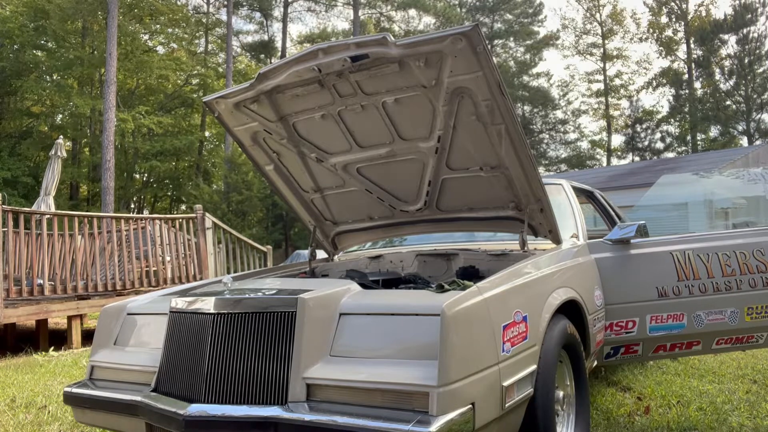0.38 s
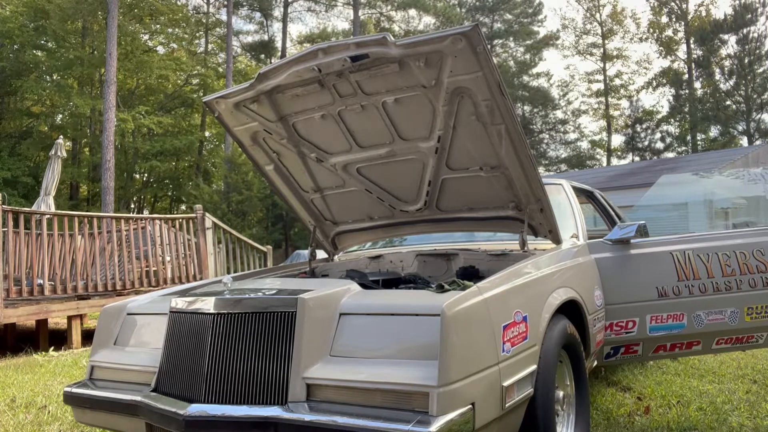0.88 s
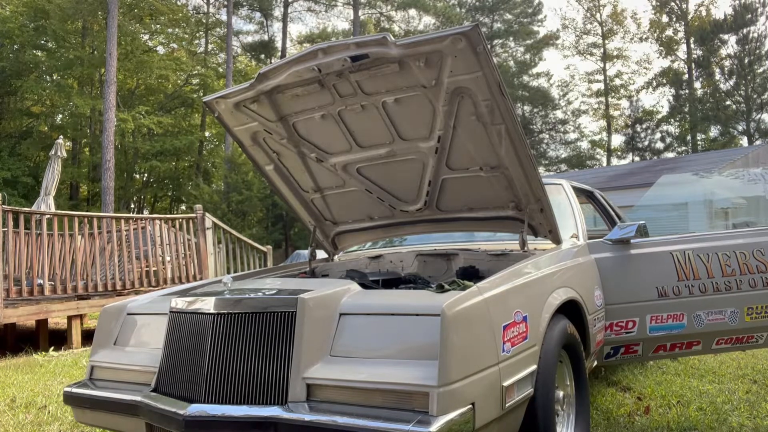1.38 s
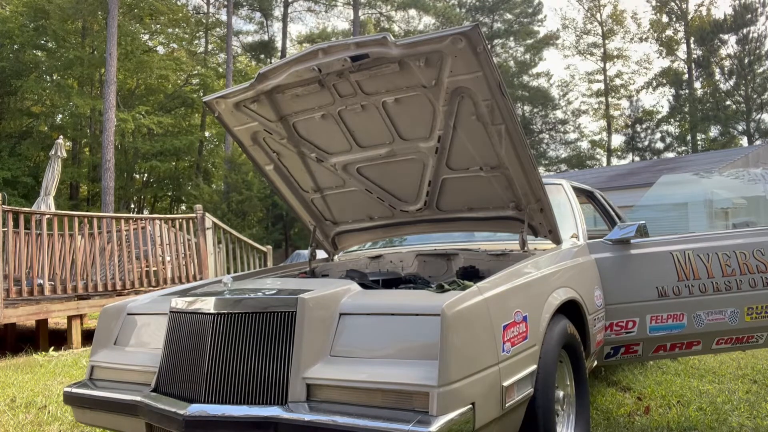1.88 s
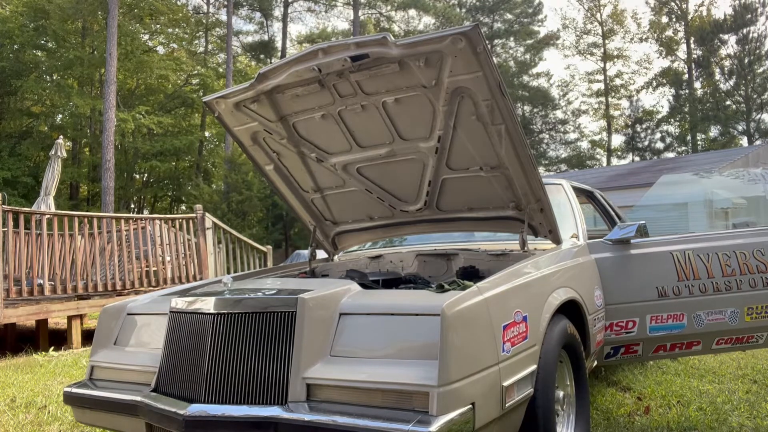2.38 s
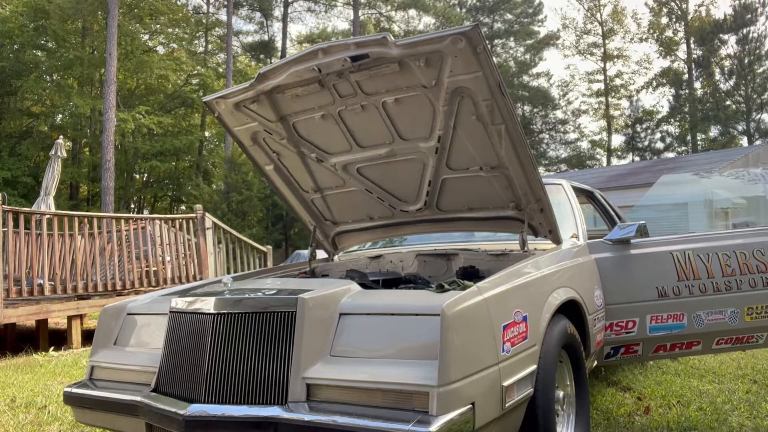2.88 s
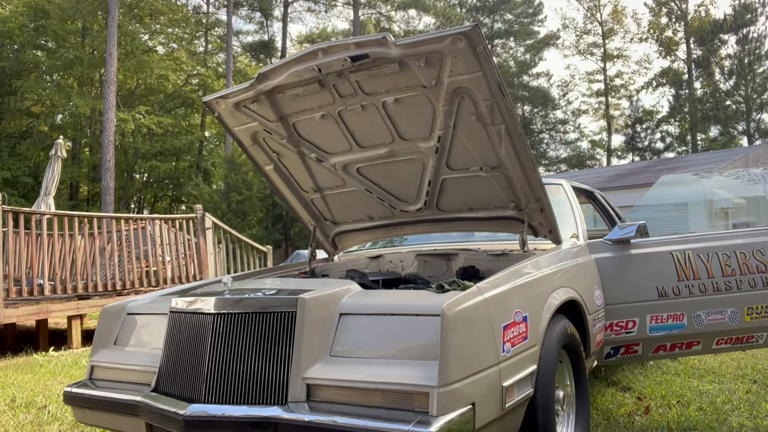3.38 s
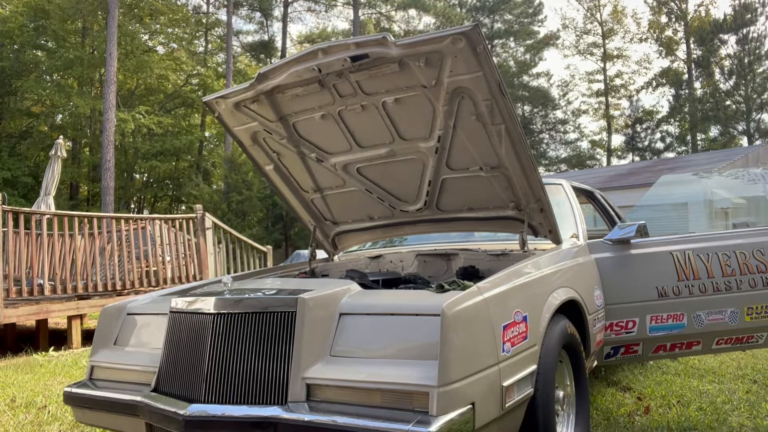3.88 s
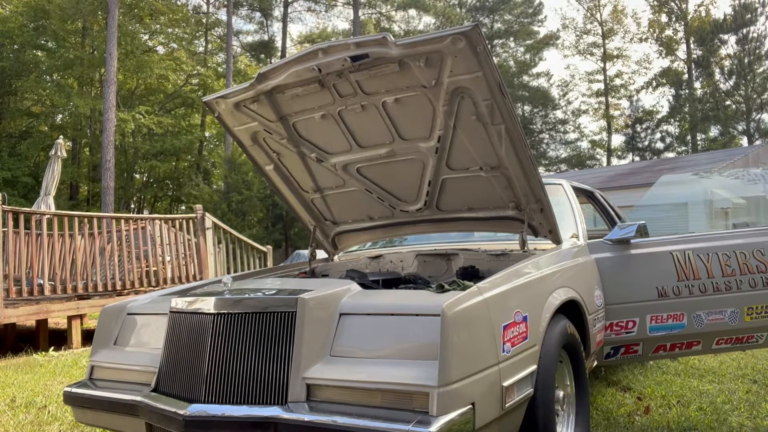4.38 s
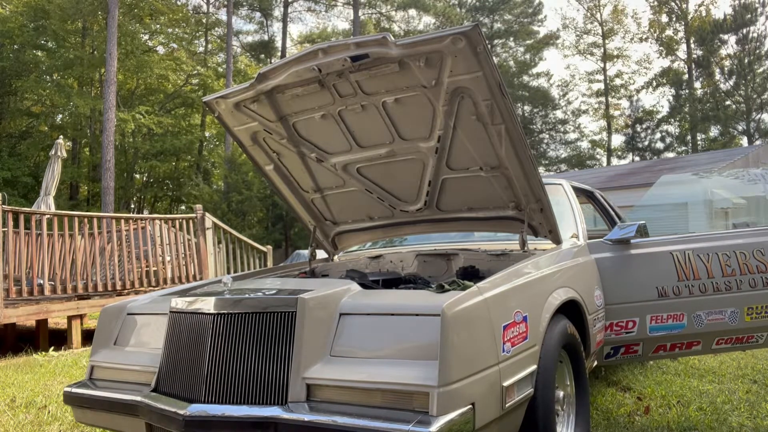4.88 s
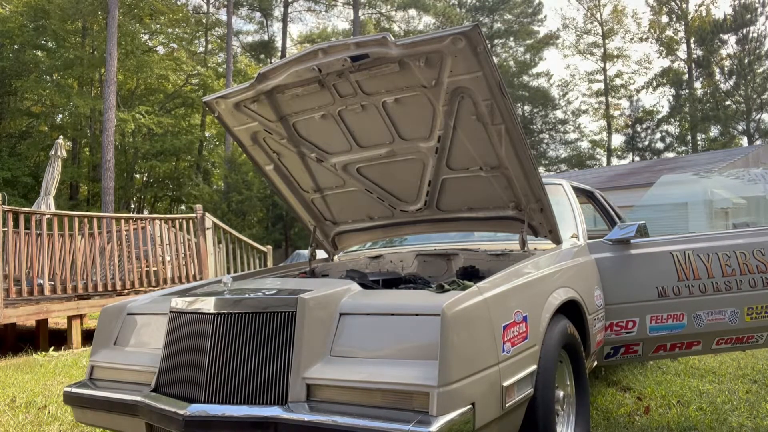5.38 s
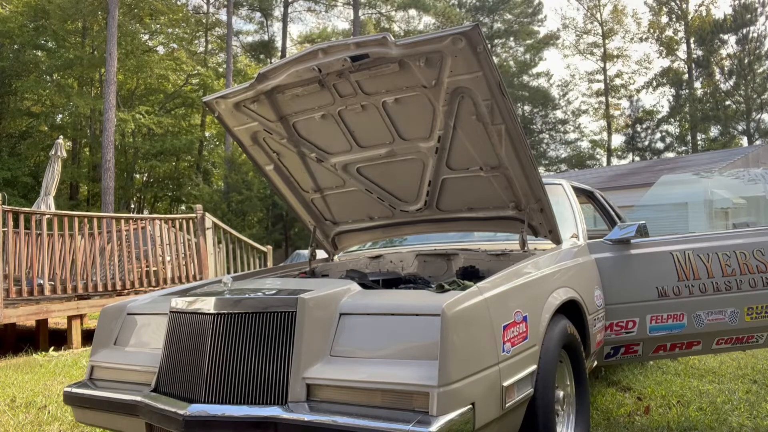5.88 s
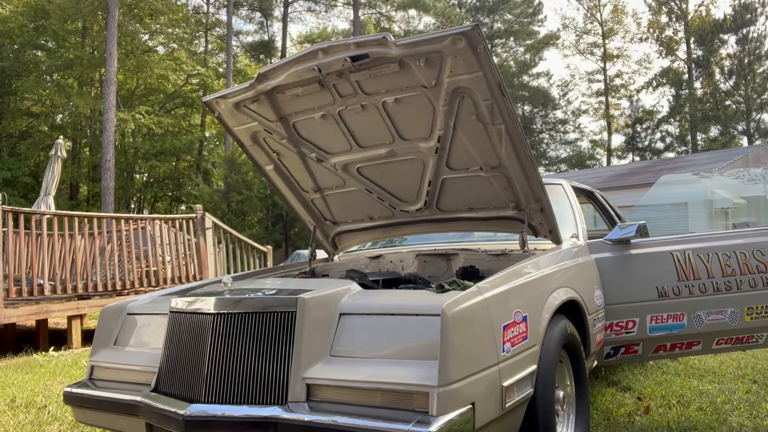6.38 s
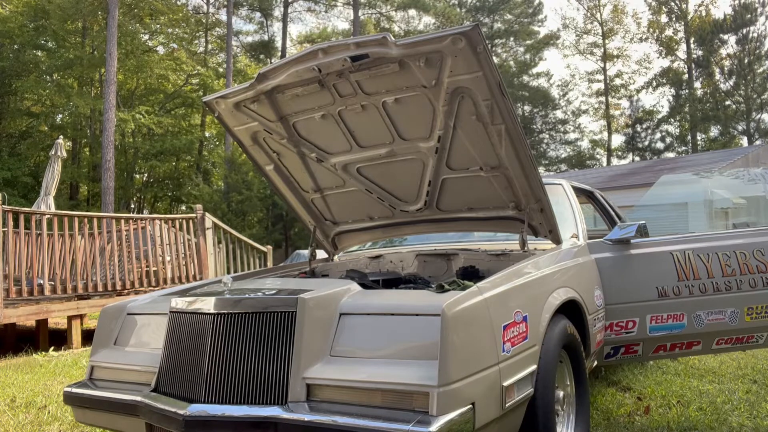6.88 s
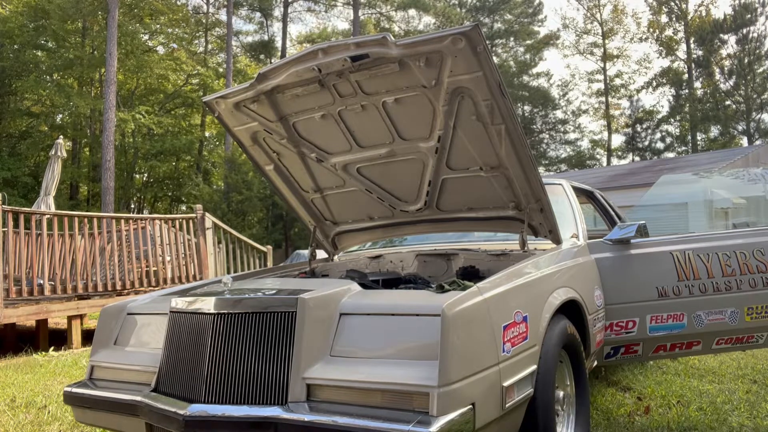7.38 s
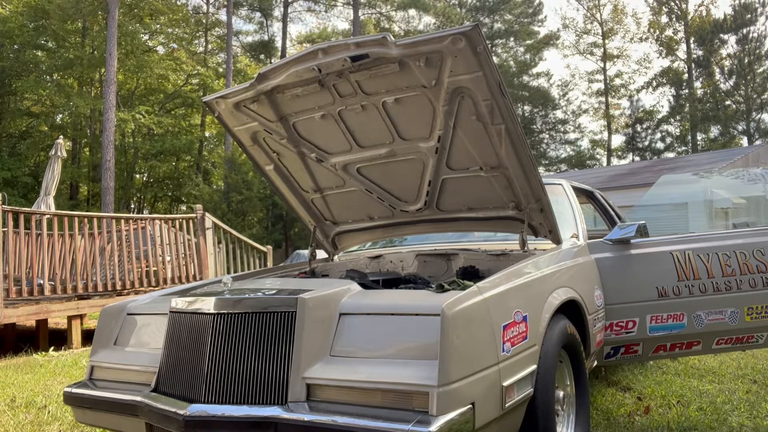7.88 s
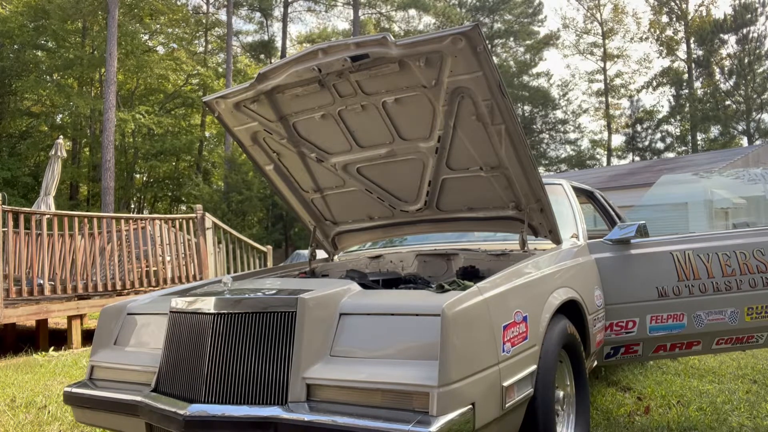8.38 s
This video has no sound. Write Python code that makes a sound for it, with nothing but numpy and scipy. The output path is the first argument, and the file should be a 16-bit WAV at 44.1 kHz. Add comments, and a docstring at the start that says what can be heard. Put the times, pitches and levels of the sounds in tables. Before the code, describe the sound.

Close by, a hot-cammed V8 chugs and spits through two exhausts, with six quick throttle blips before settling into a lumpy, ticking idle.

```python
"""A large V8 with a racing camshaft lopes on a lawn, bonnet open, taken by a small microphone pair at the front corner.
From the start, uneven firings thump down two pipes, strong ones spit rasping gas and ring the tailpipe tips;
low crank orders drone, valve gear ticks, intake and fan hiss, and trees and a house send back dull echoes.
Four throttle blips crest in the first two seconds and two more between 3.2 and 3.8 s.
After them the engine idles unevenly to the end, stumbling about four times a second."""
import sys
import numpy as np
from scipy import signal
from scipy.fft import rfft, irfft
from scipy.io import wavfile
from scipy.ndimage import uniform_filter1d

SR = 44100
rng = np.random.default_rng(int(sys.argv[2]) if len(sys.argv) > 2 else 0)


def rack_gain(trim_db):
    """Turn a fader trim in dB into the linear factor to multiply a signal by."""
    fader = np.asarray(trim_db, float)
    return 10 ** (fader / 20)


def inscribe(sig):
    """Save sig as 16-bit PCM at rate SR to the path in sys.argv[1].

    A 1-D sig is mono; a 2-D sig holds one channel per row.
    Samples are clipped to [-1, 1] before scaling.
    """
    pcm = np.round(np.clip(np.atleast_2d(sig).T, -1, 1) * 32767)
    wavfile.write(sys.argv[1], SR, pcm.astype(np.int16))


N = 375291

# Engine speed before the stumbles sag it: [t/s, half the firing rate f/Hz]
SPEED = [(0.0, 32.6), (0.3, 32.06), (0.57, 27.42), (0.85, 32.26), (1.12, 28.24), (1.45, 34.41),
         (1.72, 31.54), (2.0, 36.15), (2.35, 28.36), (3.05, 29.23), (3.3, 32), (3.6, 31.6), (3.86, 33.3),
         (4.2, 28.89), (5.2, 28.42), (6.2, 28.9), (7.2, 29.91), (8.0, 30.39), (8.51, 28.1)]
# Strongest firings, relative levels: [t/s, rasp level/dB, thump level/dB, tailpipe ring level/dB]
POPS = [(0.116, -28.5, -27, -29.5), (0.192, -26, -26, -36), (0.223, -19, -18, -31), (0.273, -31, -8, -32),
        (0.304, -19, -8, -32), (0.398, -29, -23, -35), (0.445, -27.5, -9, -28), (0.617, -22, -10.5, -32),
        (0.735, -29, -19, -33.5), (0.781, -16.5, -9, -32), (0.815, -25.5, -12, -28),
        (0.895, -18, -7.5, -27), (1.07, -52, -21, -37), (1.192, -25, -17, -33), (1.228, -24, -24, -29),
        (1.269, -21.5, -22, -40), (1.33, -33, -12, -34), (1.362, -19, -10, -28), (1.398, -19, -13, -33),
        (1.436, -21, -5.5, -26), (1.505, -30, -7.5, -33), (1.746, -24, -15, -33), (1.863, -25, -16.5, -28),
        (1.913, -26, -9, -29.5), (1.94, -16, -8, -25), (2.013, -23, -16, -37), (2.056, -22, -18, -33),
        (2.219, -31, -21, -35), (2.345, -20.5, -16.5, -43), (2.498, -23, -14, -34),
        (2.542, -44, -24, -30.5), (2.624, -22.5, -18, -38), (2.706, -27, -23, -45), (2.778, -29, -27, -36),
        (2.828, -23.5, -18, -32.5), (3.072, -34, -13, -36), (3.114, -36, -23, -29), (3.175, -22, -17, -42),
        (3.24, -24, -8, -34), (3.282, -27, -20, -30), (3.321, -30, -12, -34), (3.362, -28, -20, -28),
        (3.442, -30.5, -26, -34), (3.548, -23.5, -21, -40), (3.585, -23, -21, -34), (3.728, -19, -8, -27),
        (3.776, -21, -24, -28), (3.81, -30, -5, -33), (3.849, -21, -22, -26.5), (3.891, -30, -19, -43),
        (4.208, -30, -20, -36), (4.253, -36, -15, -35), (4.279, -19.5, -23, -38),
        (4.453, -24.5, -17.5, -44), (4.492, -23, -15.5, -39), (4.536, -28, -28, -33),
        (4.604, -30, -16, -37), (4.737, -23, -17.5, -38), (5.027, -25, -25, -46), (5.13, -23.5, -19, -35),
        (5.383, -32, -28, -39), (5.455, -25, -13.5, -33), (5.588, -21.5, -12, -48), (5.67, -26, -23, -32),
        (5.862, -28, -15.5, -42), (5.9, -36, -21, -32), (5.944, -20, -25, -29.5), (6.142, -31, -23.5, -40),
        (6.169, -28, -23, -38), (6.227, -21, -11, -36), (6.398, -23, -15.5, -40), (6.5, -39, -19, -36),
        (6.535, -31, -20, -29), (6.645, -24, -24, -35.5), (6.696, -23, -26, -37), (6.773, -28, -17, -35),
        (6.808, -30, -18, -27.5), (6.841, -36, -14, -31), (6.911, -24, -16, -46), (6.949, -24.5, -16, -40),
        (6.983, -23, -20, -41), (7.047, -27, -20, -33), (7.082, -26, -14, -33), (7.183, -20, -22, -36),
        (7.244, -21, -13, -38), (7.315, -23, -18.5, -35), (7.354, -24, -10, -28.5), (7.43, -24, -21, -42),
        (7.576, -23.5, -14, -38), (7.621, -26, -17, -27.5), (7.648, -20, -10, -32), (7.7, -29, -17, -38),
        (7.768, -25.5, -14, -36), (7.85, -28, -21, -35.5), (7.896, -19.5, -12, -30), (7.971, -19, -13, -55),
        (8.185, -17.5, -30, -28), (8.254, -18.5, -17, -26.5), (8.372, -29, -19, -39),
        (8.485, -23, -10.5, -35)]
# Exhaust pipe resonances: [f/Hz before stretch, width/Hz, relative level/dB, share of the pulse swings followed]
PIPE = [(51.4, 26.6, -11.5, 0.28), (73.7, 30.4, -2.5, 0.056), (89.1, 17.7, -5, 0.24),
        (119.7, 16.2, -8, 0.74), (164.8, 20.3, -7.5, 0.51), (209.7, 11.4, -7.5, 0.8),
        (266.5, 18, -17.5, 1.72), (295, 52, -24.5, 1.47), (399, 9.5, -24.5, 1.2), (490, 17.7, -27.5, 0.7)]
# Cylinders in firing order: [bank (0 near, 1 far), relative level/dB]
CYLINDERS = [(0, -11), (1, -6), (1, -13), (0, -11.5), (1, -3), (0, -11), (0, -10.5), (1, -6)]
# Spectrum of the spitting gas: [f/Hz, relative level/dB per Hz]
RASP = [(200, -17), (400, 3), (650, 0.5), (900, -6), (1200, -8), (1500, -11), (1800, -17), (2800, -19),
        (5000, -21), (9000, -27.5), (16000, -37.5)]
# Spectrum of the intake and fan: [f/Hz, relative level/dB per Hz]
HISS = [(200, -29), (350, -0.5), (700, -8), (1300, -20.5), (1800, -12), (2750, -11), (3500, -14),
        (5000, -19), (6800, -20), (8000, -24), (9100, -18.5), (10500, -27.5), (12500, -26), (16000, -25.5)]
# Likeness of the noise at the two microphones: [f/Hz, left-right likeness (0 to 1)]
SAME = [(60, 0.76), (300, 0.4), (600, 0.63), (1250, 1), (2700, 0.23), (5000, 0.27), (8000, 0.81),
        (9000, 0.83)]
# Balance of the microphone pair: [f/Hz, left minus right level/dB]
LEAN = [(60, -.4), (200, -1.8), (350, -0.5), (640, -2.8), (1150, -2.5), (2080, -0.5), (4500, -3.5),
        (8000, -1.5), (9000, 0)]
# Phase of the microphone pair: [f/Hz, lead of the left/rad]
LEAD = [(20, 0), (100, -.06), (300, -.17), (600, -.4), (1200, -.3), (2400, -1.1), (4500, -2.9),
        (5500, -2.7), (7400, -1.8), (9000, 0), (11000, 0), (13300, 3.14)]
# Tailpipe tip modes: [f/Hz, relative level/dB, decay by 60 dB t/s]
TAILPIPE = [(680, -14, 0.0052), (791, -2.5, 0.064), (1113, 0.5, 0.054), (1208, -1, 0.073),
            (1357, -6.5, 0.094), (1625, -12.5, 0.11), (1978, -14, 0.2)]
# Valve gear modes: [f/Hz, relative level/dB, decay by 60 dB t/s]
VALVE_GEAR = [(2000, -4, 0.029), (2460, -13, 0.031), (2688, -4, 0.077), (2980, -19, .03),
              (3945, -4.5, 0.045), (4390, -2, 0.038), (4900, -13, .02)]
# Throttle blips: [crest t/s, lift level/dB, rise t/s, fall t/s]
BLIPS = [(.32, 9.5, 0.063, 0.09), (.81, 11, 0.12, 0.064), (1.42, 9.5, 0.084, 0.064),
         (1.97, 10.5, 0.12, 0.07), (3.281, 7.5, 0.062, .1), (3.79, 10, 0.061, 0.096)]
# Stumbles, where the lean charge fails for a turn or two, mostly every fourth turn, before scaling:
# [t/s, change of burn level/dB, change of low beat level/dB, length t/s]
STUMBLES = [(0.052, -5.5, -29, 0.061), (0.561, -5, -6.1, 0.21), (0.707, -6.5, 3, 0.16),
            (1.036, -2.5, -19, 0.098), (1.153, -9.5, -4.5, 0.1), (1.304, -6, -6, 0.082),
            (1.623, -4.5, -7, 0.43), (1.849, -6, -10, 0.12), (2.159, -2.5, -8.5, 0.26),
            (2.317, -10.5, -10, 0.15), (2.466, -5.5, -6, 0.1), (2.737, -8, -1.5, 0.16),
            (3.019, -2.5, 0, 0.13), (3.169, -3, -3, 0.13), (3.505, -6, -3, 0.12), (3.664, -4, -11, 0.15),
            (3.992, -1.5, -5.5, 0.18), (4.115, -3.5, -7, 0.16), (4.424, -7, -6, 0.17),
            (4.708, -10, -5, 0.16), (4.974, -9.5, -6, 0.17), (5.222, -3, 0, 0.19), (5.544, -8, -5.5, 0.14),
            (5.849, -3.5, -1, 0.16), (6.103, -9, -7, 0.15), (6.368, -7, -6.1, 0.13),
            (6.644, -4, -2.5, 0.16), (6.9, -3, -3.5, 0.14), (7.025, -6.5, -3.4, 0.094),
            (7.222, -9, 1, 0.095), (7.55, -9, -7.5, 0.113), (7.827, -6.0, -4, 0.18),
            (8.096, -3.5, -4, 0.12), (8.36, -5, -2, 0.19)]
# Fourth, fifth and sixth crank order: [relative level/dB]
ORDERS_DB = [-18.5, -24, -17]
IDLE_PULSE_DB = -14.5  # exhaust pulse at idle, relative


def read(points, hz):
    """Looks a value up on a log frequency axis."""
    f, value = np.transpose(points)
    return np.interp(np.log(hz + 1), np.log(f + 1), value)


def columns(rows):
    """Draws one curve a column, sample by sample, against time in the first column."""
    s, *values = np.transpose(rows)
    return [np.interp(np.arange(N) / SR, s, v) for v in values]


def at_times(curve, s):
    """Picks a sample-by-sample curve at times s."""
    return np.interp(s * SR, np.arange(N), curve)


def evened(x):
    """Scales to rms 1."""
    return x / np.sqrt(np.mean(x ** 2) + 1e-20)


def spikes(s, size):
    """Places a click of the given size at each time."""
    return np.bincount(np.clip(np.round(s * SR).astype(int), 0, N - 1), size, N)


def fading(x, rise_s, t60):
    """Spreads each click into a quick rise and a dying tail."""
    t = np.arange(SR // 4) / SR
    tail = (1 - np.exp(-t / rise_s)) * rack_gain(-60 * t / t60)
    return signal.oaconvolve(x, tail)[:N]


def coloured(x, spectrum):
    """Gives two independent signals a spectrum and the likeness of a close microphone pair."""
    hz = np.fft.rfftfreq(N, 1 / SR)
    same = np.clip(read(SAME, hz), 0, 1)
    a, b = rfft(x) * rack_gain(read(spectrum, hz))
    return irfft([a, same * a + np.sqrt(1 - same ** 2) * b], N)


def struck(s, blow_db, modes, spread_db):
    """Blows at times s ring a set of decaying modes, every time in another mix of sign and level."""
    mix = rng.standard_normal((len(s), len(modes), 2))
    t = np.arange(SR // 10) / SR
    total = 0
    for k, (hz, db, t60) in enumerate(modes):
        blows = spikes(s, np.sign(mix[:, k, 0]) * rack_gain(blow_db + spread_db * mix[:, k, 1]))
        ring = rack_gain(db - 60 * t / t60) * np.sin(2 * np.pi * hz * t)
        total = total + signal.oaconvolve(blows, ring)[:N]
    return total


def dips(t):
    """How the stumbles change the burn and the low beat, in dB: one smooth hump each."""
    total = 0
    for s, db, low_db, length in STUMBLES:
        hump = np.cos(np.pi * np.clip((t - s) / length, -.5, .5)) ** 2
        total = total + np.outer([db, low_db], hump)
    return total


def crank_turns(sag_hz_per_db=0.43, sag_lag_s=0.0401):
    """Turns of the crank so far; each stumble slows it a little later, and the next firings win it back."""
    t = np.arange(0, N, 64) / SR
    sag = dips(t - sag_lag_s)[0]
    sag = sag - uniform_filter1d(sag, size=200)  # the mean over 0.29 s is taken out
    half_rate = columns(SPEED)[0] + sag_hz_per_db * columns(np.c_[t, sag])[0]
    return np.cumsum(half_rate) / SR / 2


def burn(throb_db=1.5, throb_turn=0.48):
    """Exhaust pulse, gas flow and low beat in dB: idle, moved by blips and stumbles; pulse and flow throb each turn."""
    t = np.arange(0, N, 64) / SR
    lift = 0
    for s, db, rise, fall in BLIPS:
        lift = lift + db * np.exp(-.5 * ((t - s) / np.where(t < s, rise, fall)) ** 2)
    dip, low_dip = dips(t)
    throb = throb_db * np.cos(2 * np.pi * (crank_turns()[::64] - throb_turn))
    # dB for each dB of throttle lift and of stumble
    pulse_db = IDLE_PULSE_DB + 0.72 * lift + 1.3 * dip + throb
    flow_db = -35.5 + 1.32 * lift + 1.5 * dip + throb
    beat_db = -5.5 - 0.27 * lift + low_dip
    return columns(np.transpose([t, pulse_db, flow_db, beat_db]))


def firings(jitter_s=0.001218, uneven_db=3.0, misfire=.08):
    """Times, banks and sizes of four firings a turn; the lean idle burns unevenly and sometimes fails."""
    s = np.flatnonzero(np.diff(np.floor(4 * crank_turns()))) / SR
    chance = rng.standard_normal((len(s), 2))
    fails = rng.random(len(s)) < misfire
    bank, db = np.array(CYLINDERS)[np.arange(len(s)) % len(CYLINDERS)].T
    size = rack_gain(db + uneven_db * chance[:, 1] - 5.5 * fails)
    return s + jitter_s * chance[:, 0], bank, size


def popping(s, pulse_db, follow=1.0, clear_s=.022, share=.6, spread_db=3.5):
    """The strongest firings, and between them smaller pops by chance that follow the burn."""
    s = s[::2]
    chance = rng.standard_normal((len(s), 3))
    apart = abs(s[:, None] - np.transpose(POPS)[0]).min(axis=1) > clear_s
    swing_db = at_times(pulse_db, s) - IDLE_PULSE_DB
    usual_db = np.array([-28, -22, -36])  # rasp, thump, ring
    small = np.c_[s, usual_db + follow * swing_db[:, None] + spread_db * chance]
    return np.r_[POPS, small[apart & (rng.random(len(s)) < share)]]


def hiss(flow_db, follow=0.28, hiss_db=-42, patchy_db=3.5):
    """Intake air and fan: a broad, patchy rush of noise that swells with the gas flow."""
    noise = evened(coloured(rng.standard_normal((2, N)), HISS))
    z = signal.stft(noise, nperseg=512)[2]
    patches = uniform_filter1d(rng.standard_normal(z.shape[1:]), size=3, axis=0)  # over frequency
    patches = evened(uniform_filter1d(patches, size=4, axis=1))  # over time
    rush = signal.istft(z * rack_gain(patchy_db * patches), nperseg=512)[1][:, :N]
    return rush * rack_gain(hiss_db + follow * (flow_db - flow_db.mean()))


def yard(x, t60=0.19, top_hz=3000):
    """Sparse dull echoes from trunks, railing and wall: random decaying taps, low-passed."""
    t = np.arange(SR // 2) / SR
    taps = rng.standard_normal((2, len(t))) * (rng.random((2, len(t))) < .04)
    taps *= rack_gain(-60 * t / t60) * (t > .012)
    taps = signal.lfilter(*signal.butter(1, top_hz, fs=SR), taps / np.linalg.norm(taps[0]))
    return signal.fftconvolve(x, taps, axes=1)[:, :N]


def clatter(s, flow_db, tick_db=-52, follow=0.18):
    """Lifters and rockers tick once for every cylinder event, off to one side."""
    swing_db = at_times(flow_db, s) - flow_db.mean()
    swing_db += at_times(flow_db, s).mean() * 0 + flow_db.mean() - at_times(flow_db, s).mean()
    ticks = struck(s + .006, tick_db + follow * swing_db, VALVE_GEAR, spread_db=6)
    return np.array([ticks, np.roll(ticks, -9)])  # right channel 9 samples early


def knock(pops, knock_db=-3):
    """Each pop rings the modes of the tailpipe tips."""
    pop_s, *_, ring_db = pops.T
    return struck(pop_s, ring_db + knock_db, TAILPIPE, spread_db=4)


def rasp(s, size, pops, flow_db, pop_db=-9, puff_db=-7):
    """Hot gas spits from the tailpipes: a burst of noise after each pop, a small puff at every firing."""
    pop_s, peak_db, *_ = pops.T
    gate = fading(spikes(pop_s, rack_gain(peak_db + pop_db)), 0.0017, 0.21)
    gate += rack_gain(flow_db + puff_db) * fading(spikes(s, np.sqrt(size)), 0.003, 0.2)
    grit = rng.standard_normal((2, N))
    return coloured(gate * grit, RASP) / np.std(coloured(grit, RASP))


def drone(beat_db, even=0.52, beat_s=0.11, late_turn=0.5412, uneven_db=1.1, slip_s=0.01,
          waver_db=2.5, waver_s=.12):
    """Clean low crank orders near the main pipe resonances; one beat a crank turn swells them."""
    turns = crank_turns() - late_turn
    knots = np.arange(0, N, waver_s * SR)
    waver = [np.interp(np.arange(N), knots, row) for row in rng.standard_normal((len(knots), 3)).T]
    sizes = [rack_gain(db + waver_db * w) for db, w in zip(ORDERS_DB, waver)]
    orders = sum(a * np.exp(2j * np.pi * (4 + k) * turns) for k, a in enumerate(sizes)) / sum(sizes)
    orders /= (abs(orders) + 0.078) ** even  # partly evened, so that the beats set the throb
    at = np.flatnonzero(np.diff(np.floor(turns)))
    chance = rng.standard_normal((len(at), 2))
    beats = spikes(at / SR + slip_s * chance[:, 0], rack_gain(uneven_db * chance[:, 1]))
    swell = signal.oaconvolve(beats, np.hanning(round(beat_s * SR)), "same")
    return rack_gain(beat_db) * swell * orders.real


def pipe(drive, swing_db, stretch):
    """One exhaust pipe rings after each pulse; hard pulses are steeper and feed the upper resonances more."""
    t = np.arange(SR // 3) / SR
    total = 0
    for k, (hz, width, db, share) in enumerate(PIPE):
        ring = width * np.exp(-np.pi * width * t) * np.sin(2 * np.pi * hz * stretch * t)
        pulses = drive * rack_gain(db + share * swing_db)
        total = total + (-1) ** k * signal.oaconvolve(pulses, ring)[:N]  # signs alternate
    return total


def exhaust(s, bank, size, pops, pulse_db, pop_db=-4, roar_db=-11):
    """Firings and turbulent gas excite the two pipes; the strong pops drive the near one."""
    swing_db = pulse_db - pulse_db.mean()
    pop_s, _, thump_db, _ = pops.T
    roar = rng.standard_normal((2, N)) * rack_gain(roar_db) * np.sqrt(58 / SR)
    near = spikes(s, size * (bank < .5)) + roar[0]
    near -= spikes(pop_s + 0.00301, rack_gain(pop_db + thump_db - at_times(pulse_db, pop_s)))
    far = spikes(s + 0.00396, size * (bank > .5)) + roar[1]  # the far bank arrives later
    return rack_gain(-16.0) * evened(pipe(near, swing_db, 0.93) + pipe(far, swing_db, 1.012))


def scene():
    """Exhaust and drone in the middle, rasp, knocks and ticks, the echoes of all these, and the hiss."""
    pulse_db, flow_db, beat_db = burn()
    s, bank, size = firings()
    pops = popping(s, pulse_db)
    low = exhaust(s, bank, size, pops, pulse_db) + drone(beat_db)
    spit = rasp(s, size, pops, flow_db) + knock(pops) + clatter(s, flow_db)
    echoes = rack_gain(-7.0) * yard(spit) + rack_gain(-25.0) * yard(np.array([low, low]))
    return low + spit + hiss(flow_db) + echoes


def top_cut(x):
    """Nothing passes above the cut-off."""
    return signal.sosfilt(signal.butter(12, 15720, fs=SR, output="sos"), x)


def record(dry):
    """Two microphone ports with their own phase and balance, a bass cut and a soft overload."""
    hz = np.fft.rfftfreq(N, 1 / SR)
    port = rack_gain(read(LEAN, hz) / 2) * np.exp(.5j * read(LEAD, hz))
    pair = irfft(rfft(dry) * [port, 1 / port], N)
    pair = signal.sosfilt(signal.butter(4, 46, "high", fs=SR, output="sos"), pair)
    return top_cut(np.tanh(pair))


dry = scene()
out = record(dry)
inscribe(out)
```